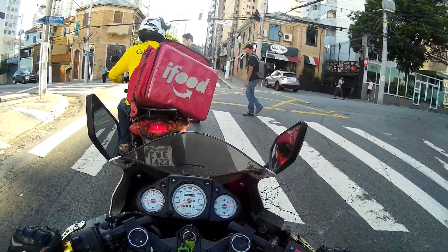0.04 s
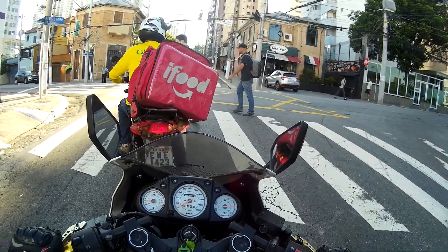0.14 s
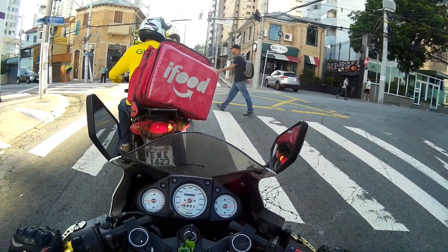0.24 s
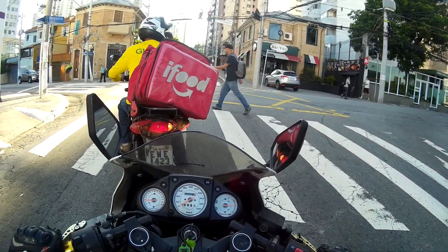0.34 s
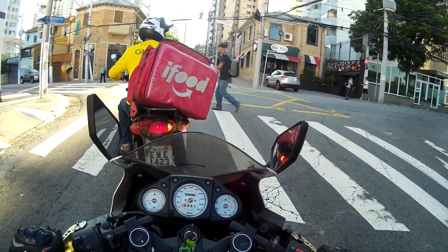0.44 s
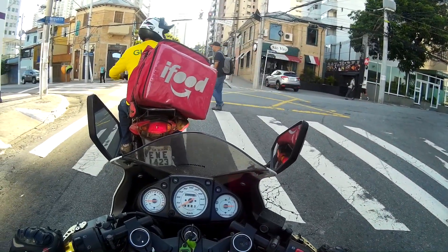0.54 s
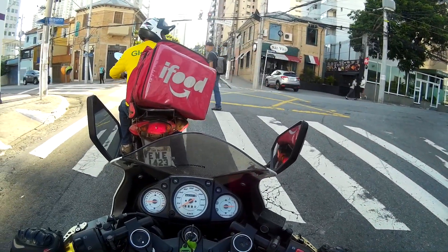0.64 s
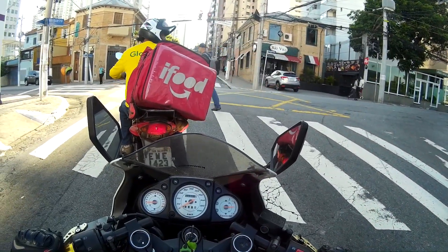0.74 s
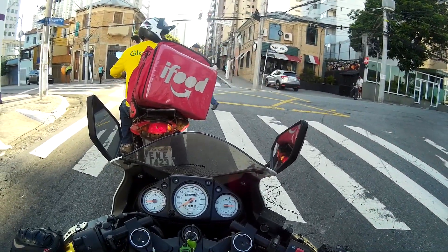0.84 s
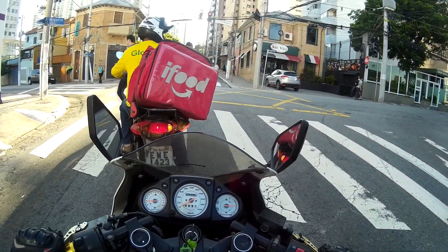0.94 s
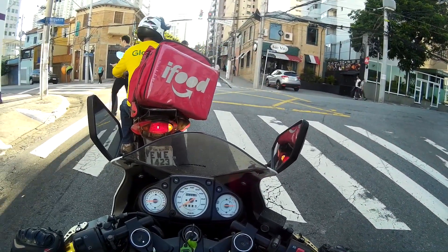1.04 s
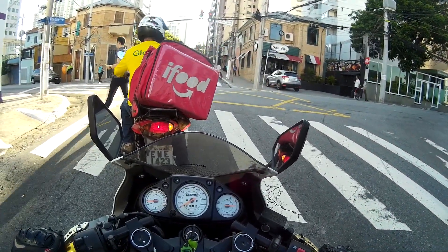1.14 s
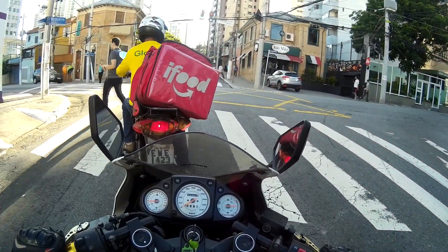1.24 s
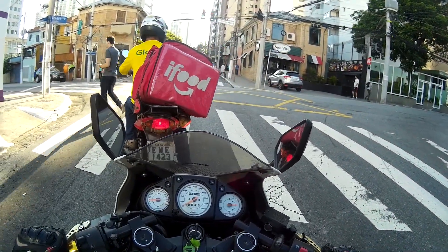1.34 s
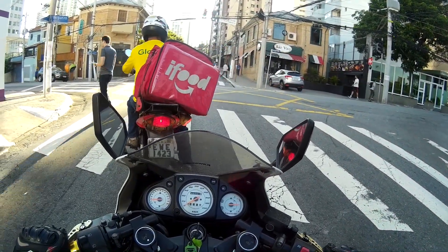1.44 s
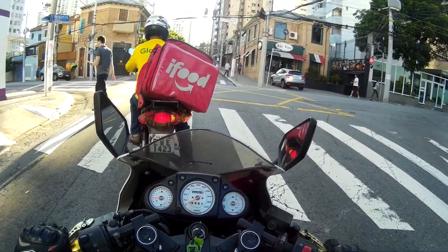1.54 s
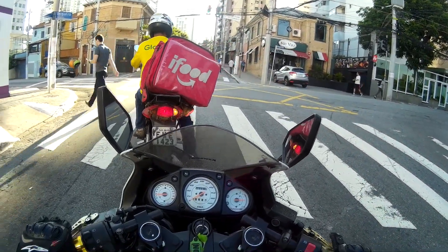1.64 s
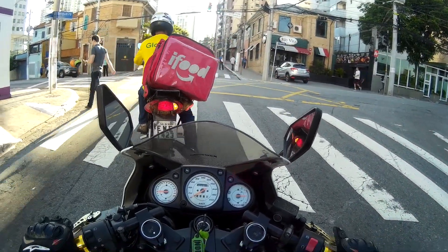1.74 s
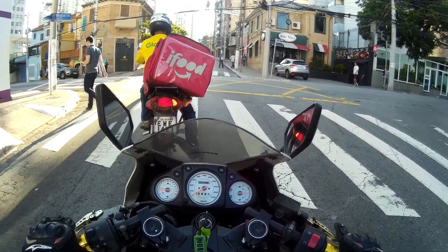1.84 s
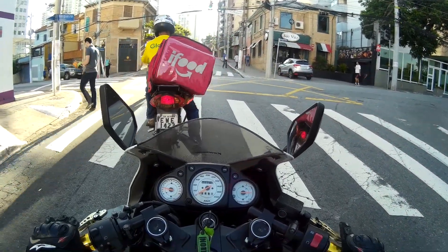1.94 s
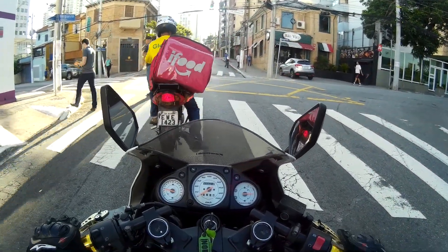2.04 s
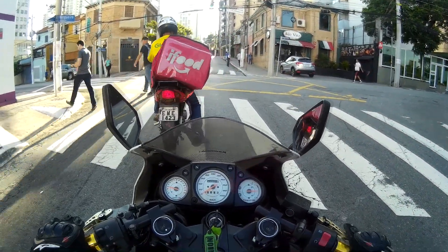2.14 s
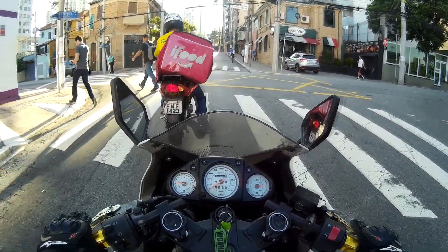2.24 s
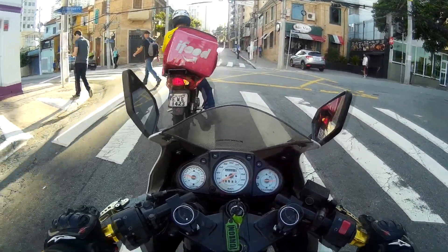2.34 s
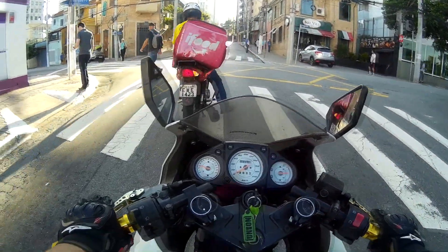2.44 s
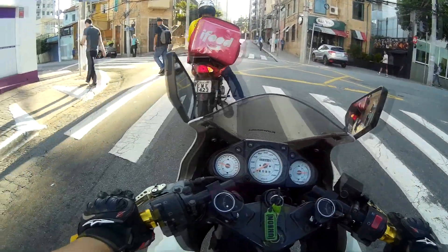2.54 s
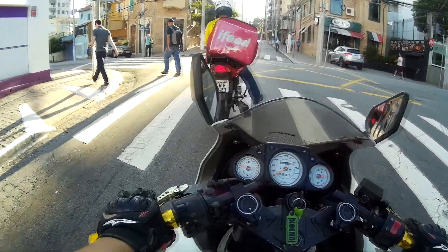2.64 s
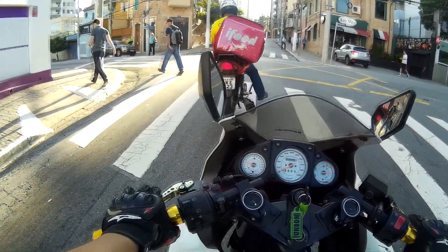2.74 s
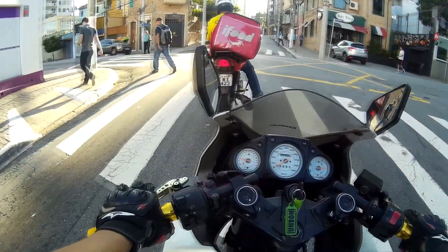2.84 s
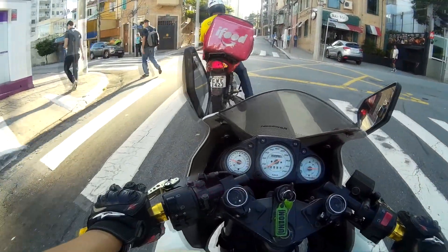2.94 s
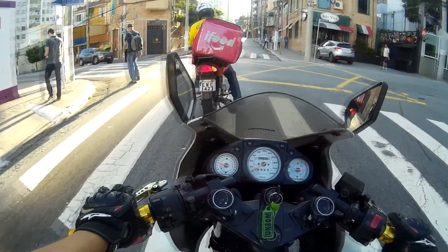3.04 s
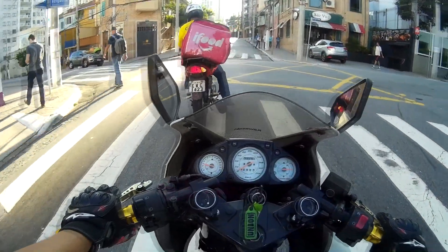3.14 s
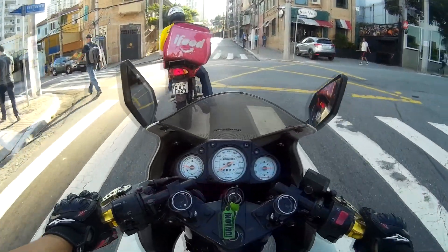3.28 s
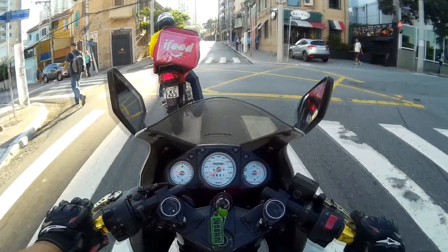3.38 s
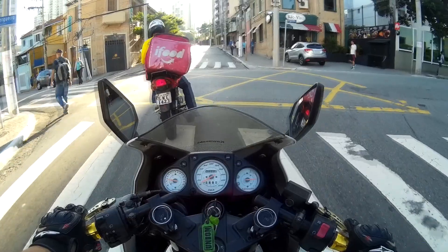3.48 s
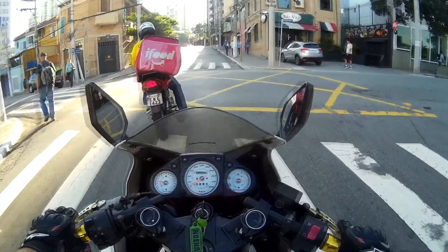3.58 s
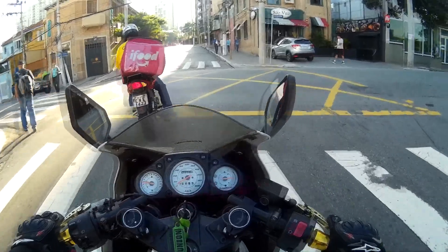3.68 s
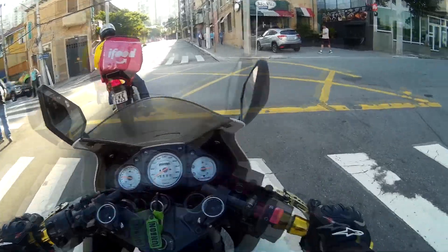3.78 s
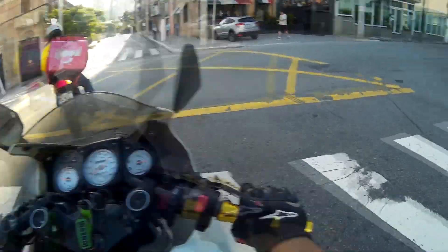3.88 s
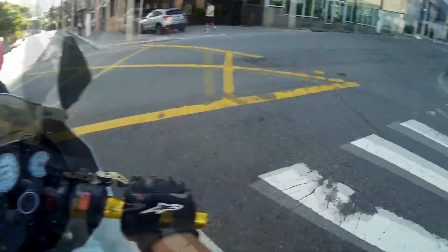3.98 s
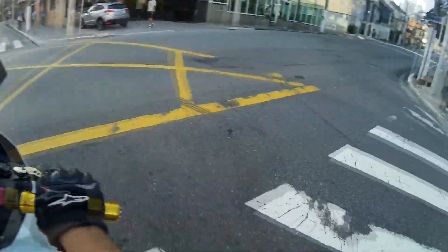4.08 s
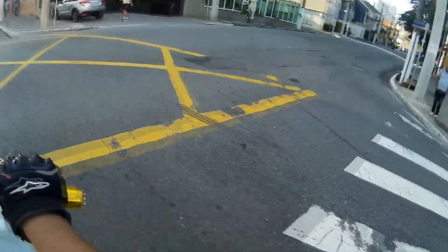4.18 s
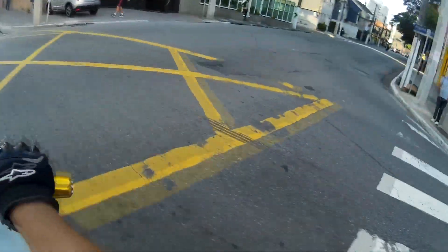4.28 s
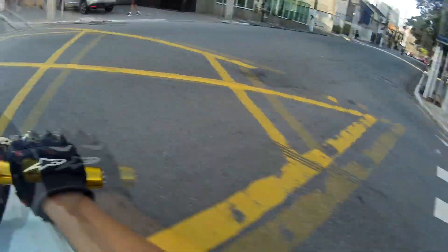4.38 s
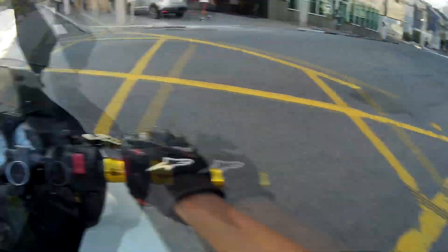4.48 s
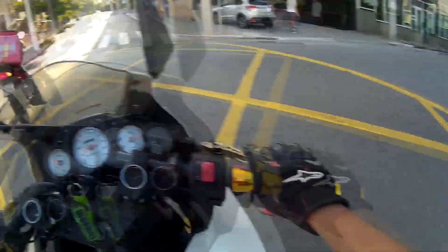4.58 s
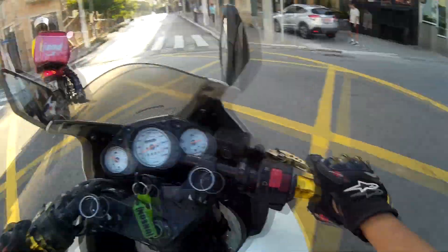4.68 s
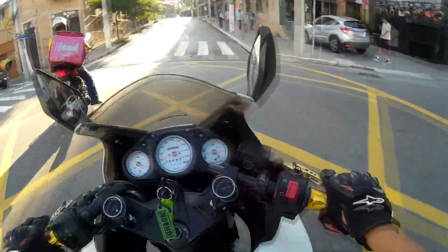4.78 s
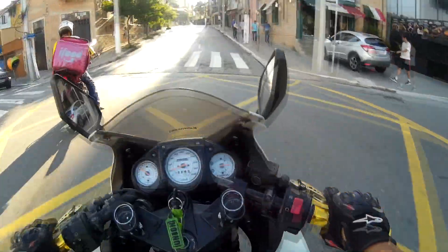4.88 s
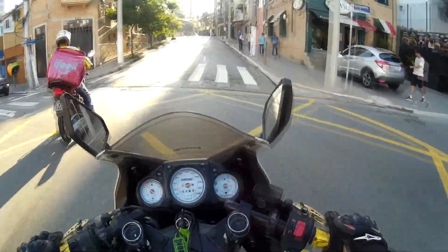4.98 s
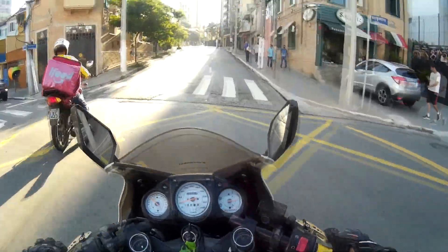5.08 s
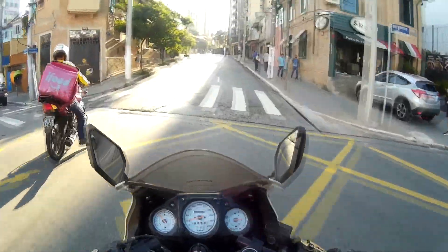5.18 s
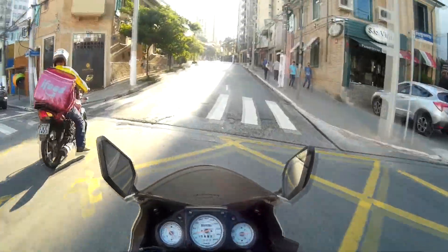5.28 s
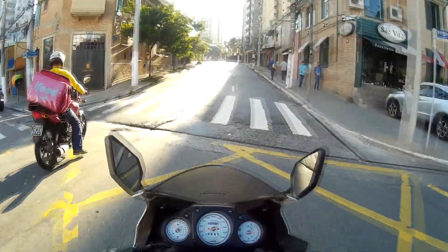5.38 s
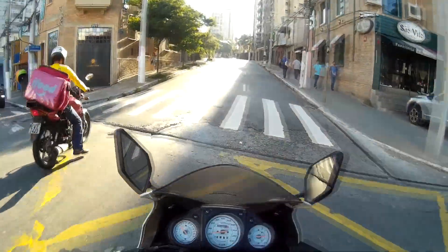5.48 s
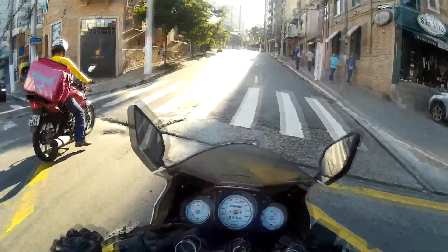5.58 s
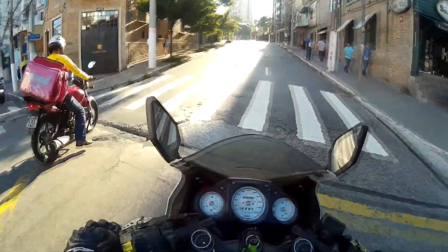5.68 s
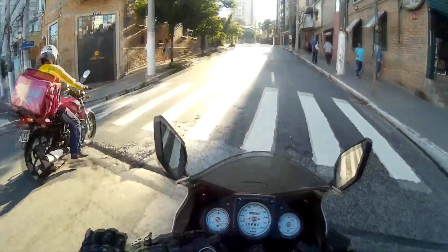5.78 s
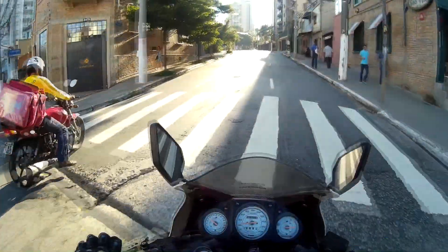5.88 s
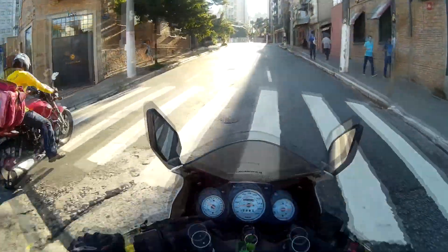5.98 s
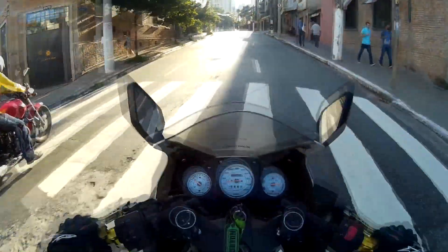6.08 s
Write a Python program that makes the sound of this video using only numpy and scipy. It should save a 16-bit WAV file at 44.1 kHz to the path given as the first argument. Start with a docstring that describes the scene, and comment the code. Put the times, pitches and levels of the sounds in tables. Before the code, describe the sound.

A small single-cylinder motorcycle idles softly just ahead, with separate hollow puffs and faint metal ticks over murmuring traffic. It suddenly revs up and pulls away in a steady throb, then accelerates to a raspy, ringing roar. The throttle shuts for a gear change, leaving a short low burble, and the engine pulls again. Outdoors, close microphone on a following rider, with light echo from house fronts and low wind buffeting.

```python
"""At a city crossing, a small single-cylinder motorcycle idles just ahead, pulls away, revs up, changes gear and pulls again.
Each firing drives two gas pulses through a resonant silencer; throttle sharpens them.
Pulsed noise makes the rasp, meshing teeth the gear whine, short resonant bursts the metal ticks.
House fronts echo, traffic murmurs, and low noise is the wind that buffets the microphone of the rider who follows."""
import sys
import numpy as np
from scipy import signal
from scipy.fft import rfft, irfft
from scipy.io import wavfile
from scipy.ndimage import uniform_filter1d

SR = 44100
rng = np.random.default_rng(int(sys.argv[2]) if len(sys.argv) > 2 else 0)


def transcribe(u):
    """Save the signal u as a 16-bit wav file named by the first command-line argument.

    u: samples, shape (n,) or (channels, n), limited to [-1, 1]; the rate is SR.
    q: integer samples, one column per channel.
    """
    v = np.clip(np.atleast_2d(u).T, -1, 1)
    q = np.round(v * 32767).astype(np.int16)
    wavfile.write(sys.argv[1], SR, q)


N = 269892
TIME = np.arange(N) / SR   # s

# engine speed; columns: time_s, firing_rate_hz
ENGINE_SPEED = [(0, 12.95), (.984, 13.59), (1.603, 13.5), (1.832, 24.12), (2.084, 24.96), (2.739, 20.8),
                (3.202, 20.47), (3.494, 22.18), (4.451, 34.54), (4.798, 39.61), (5.07, 42.64), (5.2, 38.81),
                (5.36, 36.27), (5.508, 37.27), (5.663, 30.87), (6.12, 35.22)]
# the rider's hand: a blip, easing off on the clutch, a long pull, a gear change, a second pull
# columns: time_s, throttle (0 to 1)
THROTTLE = [(1.57, 0), (1.63, 0.09), (1.88, 0.4), (2.42, 0.29), (2.85, 0.22), (3.5, 0.35), (3.95, .68),
            (4.1, 0.88), (4.3, 1), (4.5, 1), (5.02, 0.86), (5.16, 0.34), (5.37, 0.1), (5.42, 0.41),
            (5.68, 0.74), (6.12, 0.65)]
# single strokes that burn unevenly; columns: time_s, size_change_db, sharpness_factor
ODD_STROKES = [(1.785, -7, 1.43), (1.915, 1, 1.06), (1.953, -11.5, 1.2), (2.118, -8, 1.34), (4.33, -1, 2.2),
               (5.114, 2.5, 0.46), (5.139, -4.5, 3.1), (5.24, 2, 1.28)]
# levels as the bike draws ahead, then off to the side; columns: time_s, pipe_level_db, rasp_level_db
BIKE_PLACE = [(2.0, 1.7, 5), (3.0, 2.5, 3), (4.3, -2.84, 0), (4.85, -6, 0.5), (5.5, -7, -3.5),
              (6.12, -4.5, 3.5)]
# weaker chamber resonances and one dip; columns: centre_hz, width_hz, gain_db
CHAMBERS = [(167.6, 34, -3), (798.4, 36.7, 8.5), (1022, 46, 8), (1346, 207, 15)]
# spectrum of the gas rasp; columns: frequency_hz, relative_density_db (per Hz)
RASP_COLOUR = [(600, 11.5), (1000, 0), (1400, 0.5), (1850, -1.5), (2500, -11), (3100, -13.5), (3900, -21),
               (4700, -20), (5700, -31), (7000, -29.5), (9000, -37.5), (12000, -44.5), (15500, -63)]
# light metal ticks and clinks of the controls and drive; columns: start_s, peak_level_db, pitch_hz
TICKS = [(0.022, -45, 3980), (0.32, -47, 4150), (.385, -48.5, 3580), (0.443, -49, 3900), (.757, -50, 5000),
         (.788, -51, 4000), (0.842, -51, 4100), (1.12, -43, 3350), (1.791, -51, 7350), (1.83, -54, 7300),
         (1.857, -50, 7200), (1.923, -47, 7300), (5.556, -44.5, 3800), (5.591, -44, 3830)]
# echoes off road, fairing and house fronts; columns: delay_s, level_db
ECHOES = [(0.0107, -19.5), (0.0151, -23.5), (0.032, -26.5), (.058, -34), (0.098, -28.5)]
# spectrum of the wind; columns: frequency_hz, relative_density_db (per Hz)
WIND_COLOUR = [(20, 2), (38, 13), (65, 14.5), (130, -15.5), (400, -40)]
# spectrum of distant traffic and hiss; columns: frequency_hz, relative_density_db (per Hz)
STREET_COLOUR = [(60, -9.5), (105, 1.5), (160, -4.5), (240, 3), (370, -12.5), (500, -10), (750, -17.5),
                 (1000, -17), (1300, -33.5), (1850, -24.5), (2600, -39.5), (4500, -40.5), (8000, -43.5),
                 (15500, -49)]

START_PHASE, PISTON_LAG = .237, .241   # firing cycles
# throttle makes the puffs sharper and a little bigger
SOFT_PUFF_HZ, SHARPEN_OCTAVES, PUFF_DB, PUFF_OPEN_DB = 164, 3.616, -17.5, 5.5
# below a small opening the cylinder is starved of air: puffs and rasp fall away
STARVED_THROTTLE, STARVED_PUFF_DB, STARVED_RASP_DB = 0.2, -2.5, -20.5
# at high revs the silencer rings harder and the rasp grows
HIGH_REVS_FROM, HIGH_REVS_SPAN = 33.2, 5.9   # firings per s
HIGH_RING_DB, HIGH_RASP_DB = 3, 6.5

TAILPIPE_HZ, TAILPIPE_WIDTH_HZ, EXHAUST_DB = 712.4, 151.7, 43.0
# the boom is carried up by the revs from a lowest pitch
LOWEST_BOOM_HZ, BOOM_PER_FIRING, BOOM_WIDTH_HZ, BOOM_DB = 95, 4.1, 43, 7.5
# the second chamber resonance follows the boom part of the way
HOLLOW_HZ, HOLLOW_WIDTH_HZ, HOLLOW_DB, HOLLOW_FOLLOW = 228.5, 48, 5.5, 0.16
# the ring rises with hotter gas; with little gas flowing it is damped less
RING_HZ, RING_OPEN_HZ, RING_WIDTH_HZ, RING_DB, STILL_RING_DB = 468.4, 34.6, 48.2, 17.5, 1

RASP_DB = -40
# throttle shut for the gear change: start, attack, hold, release [s]
OVERRUN = (5.095, 0.031, 0.25, 0.023)
BURBLE_HZ, BURBLE_SAG_HZ_PER_S, BURBLE_DB = 158, 190, -32.5
# gear whine: teeth per firing, level entering the casing at full throttle, change when shut
WHINE_ORDER, WHINE_DB, WHINE_SHUT_DB = 46, -39.5, -13.5
CASING_HZ, CASING_WIDTH_HZ = 1827, 160

# wind swells as the following rider sets off: start, attack, hold, release [s]
GUST = (3.3, 1.0, 0.83, .2)
BREEZE_DB, GUST_DB = -55.5, -50
# at first the traffic is louder, then it dies down
STREET_DB, TRAFFIC_SWELL_DB, TRAFFIC_FADE_S = -42, 3, 0.62
# a faint hiss while the bikes wait: start, attack, hold, release [s]
HISS = (-0.079, .05, 1.3, 0.12)
HISS_DB, HISS_HZ, HISS_WIDTH_HZ = -67.5, 3504.5, 1900
CUTOFF_HZ = 15700


def gas_flow(piston_db, piston_sharpness, piston_spread_db, piston_jitter_s):
    """Blowdown and displacement: the opening exhaust valve frees one puff, the rising piston drives out a second."""
    times, cycle_s, size, sharp_hz = firings(sharp_spread_db=0.96, jitter_s=.00005)
    chance = rng.standard_normal((len(times), 2))
    second_times = times + PISTON_LAG * cycle_s + piston_jitter_s * chance[:, 0]
    second_size = size * from_db(piston_db + piston_spread_db * chance[:, 1])

    puff_times = np.r_[times, second_times]
    puff_sizes = np.r_[size, second_size]
    puff_hz = np.r_[sharp_hz, sharp_hz * piston_sharpness]
    flow = np.zeros(N)
    for start_s, amount, hz in zip(puff_times, puff_sizes, puff_hz):
        first = int(start_s * SR)
        span = slice(first, first + SR // 50)
        age = np.maximum(TIME[span] - start_s, 0)
        flow[span] += amount * puff(age, hz, opening=1.21, suction=0.98, suction_hz=150, hard_hz=940)
    return flow


def firings(sharp_spread_db, jitter_s):
    """Cyclic variation: firings follow speed and throttle, with chance in timing and sharpness."""
    cycles = engine_cycles()
    times = np.interp(np.arange(1, int(cycles[-1]) + 1), cycles, TIME)
    throttle = read(THROTTLE, times)[0]
    size_db = PUFF_DB + PUFF_OPEN_DB * throttle + STARVED_PUFF_DB * starved(throttle)
    size_db = size_db + read(BIKE_PLACE, times)[0]
    sharp_hz = SOFT_PUFF_HZ * 2 ** (SHARPEN_OCTAVES * throttle)
    for time_s, db, factor in ODD_STROKES:
        nearest = np.argmin(abs(times - time_s))
        size_db[nearest] += db
        sharp_hz[nearest] *= factor

    chance = rng.standard_normal((len(times), 2))
    sharp_hz = sharp_hz * from_db(sharp_spread_db * chance[:, 0])
    cycle_s = 1 / read(ENGINE_SPEED, times)[0]
    return times + jitter_s * chance[:, 1], cycle_s, from_db(size_db), sharp_hz


def puff(age, hz, opening, suction, suction_hz, hard_hz):
    """Pulse and rarefaction: the valve's opening rounds the gas pulse; a hard one leaves a slow suction behind it."""
    def pulse(corner_hz):
        """Critically damped pulse: a linear rise under exponential decay."""
        w = 2 * np.pi * corner_hz
        return w * w * age * np.exp(-w * age) / 1000

    r = np.exp(-2 * np.pi * opening * hz / SR)
    rounded = signal.lfilter([1 - r], [1, -r], pulse(hz))
    hardness = hz / (hz + hard_hz)
    return rounded - suction * hardness * pulse(suction_hz)


def exhaust(flow, turbulence, swirl_hz, volume_hz, mouth_hz):
    """Acoustic filtering: the silencer's volume smooths, chambers and tailpipe ring, the small mouth radiates little bass."""
    swirl = rms_one(cut(rng.standard_normal(N), swirl_hz, "low"))
    x = cut(flow * (1 + turbulence * swirl), volume_hz, "low")

    throttle = read(THROTTLE)[0]
    boom_hz = np.maximum(LOWEST_BOOM_HZ, BOOM_PER_FIRING * read(ENGINE_SPEED)[0])
    hollow_hz = HOLLOW_HZ * (boom_hz / boom_hz[0]) ** HOLLOW_FOLLOW
    ring_hz = RING_HZ + RING_OPEN_HZ * throttle
    ring_db = RING_DB + HIGH_RING_DB * high_revs() + STILL_RING_DB * starved(throttle)
    gliding = [(boom_hz, BOOM_WIDTH_HZ, BOOM_DB),
               (hollow_hz, HOLLOW_WIDTH_HZ, HOLLOW_DB),
               (ring_hz, RING_WIDTH_HZ, ring_db)]
    # in series: each adds a peak (or dip) to what went before
    for hz, width_hz, db in gliding:
        x = x + (from_db(db) - 1) * gliding_resonance(x, hz, width_hz)
    for hz, width_hz, db in CHAMBERS:
        x = x + (from_db(db) - 1) * resonate(x, hz, width_hz)
    tailpipe = resonate(x, TAILPIPE_HZ, TAILPIPE_WIDTH_HZ)
    return from_db(EXHAUST_DB) * cut(tailpipe, mouth_hz, "high")


def rasp(flow, decay_s, steady):
    """Flow-modulated noise: each puff tears a burst of hiss from the pipe, over the engine's steady clatter."""
    r = np.exp(-1 / (decay_s * SR))
    burst = signal.lfilter([1 - r], [1, -r], flow + 1e-18)
    # level the bursts over 0.15 s, so that only their rhythm remains
    burst = burst / np.sqrt(uniform_filter1d(burst ** 2, size=6615) + 1e-9)
    gate = np.sqrt((burst ** 2 + steady ** 2) / (1 + steady ** 2))
    db = RASP_DB + STARVED_RASP_DB * starved(read(THROTTLE)[0])
    db = db + HIGH_RASP_DB * high_revs() + read(BIKE_PLACE)[1]
    return from_db(db) * gate * noise(RASP_COLOUR)


def crackle(pressure, level_db, low_hz, high_hz):
    """Nonlinear radiation: noise grows with squared pressure, so the strongest peaks spit drily at the mouth."""
    spit = cut(rng.standard_normal(N) * pressure ** 2, low_hz, "high")
    return from_db(level_db) * cut(spit, high_hz, "low", order=3)


def burble(swell):
    """Pumping: with the throttle shut, each stroke sends a soft, low thump through the pipe, sinking in pitch."""
    hz = BURBLE_HZ - BURBLE_SAG_HZ_PER_S * np.clip(TIME - OVERRUN[0], 0, sum(OVERRUN[1:]))
    turn = engine_cycles() % 1
    age = turn / read(ENGINE_SPEED)[0]
    window = np.sin(np.pi * turn ** swell) ** 2
    thumps = rms_one(window * np.sin(2 * np.pi * hz * age))
    return -from_db(BURBLE_DB) * envelope(*OVERRUN) * thumps


def whine(width_hz, rough, throb):
    """Gear meshing: a rough tone throbs with the power strokes, loudest where it meets the casing's resonance."""
    stroke = 2 * np.pi * engine_cycles()
    in_phase, quadrature = rms_one(cut(rng.standard_normal((2, N)), width_hz, "low"))
    tone = (1 + rough * in_phase) * np.cos(WHINE_ORDER * stroke)
    tone = tone + rough * quadrature * np.sin(WHINE_ORDER * stroke)
    pressed = rms_one(tone * (1 + throb * np.sin(stroke)))
    db = WHINE_DB + WHINE_SHUT_DB * (1 - read(THROTTLE)[0])
    return from_db(db) * resonate(pressed, CASING_HZ, CASING_WIDTH_HZ)


def ticks(decay_s, width_hz):
    """Impact excitation: each touch of metal is a short burst in one resonance."""
    out = np.zeros(N)
    age = TIME[:SR // 20]
    for start_s, db, hz in TICKS:
        burst = rng.standard_normal(len(age)) * np.exp(-age / decay_s)
        tick = resonate(burst, hz, width_hz)
        first = max(int(start_s * SR), 0)
        out[first:first + len(age)] += from_db(db) * tick / abs(tick).max()
    return out


def street_echo(x, tail_db, t60_s, dull_hz):
    """Reflection and reverberation: a few dull echoes and a thin, diffuse tail between the houses."""
    age = TIME[:SR]
    response = rng.standard_normal(SR) * from_db(-60 * age / t60_s) * (age > .01)
    response *= from_db(tail_db) / np.linalg.norm(response)
    for delay_s, db in ECHOES:
        response[int(delay_s * SR)] += from_db(db)
    return cut(signal.fftconvolve(x, response)[:N], dull_hz, "low")


def wind():
    """Turbulent pressure: low noise at the microphone, a breeze that swells into a gust."""
    gain = from_db(BREEZE_DB) + from_db(GUST_DB) * envelope(*GUST)
    return gain * noise(WIND_COLOUR)


def traffic():
    """Superposition: many distant sources merge into coloured noise, louder at first."""
    db = STREET_DB + TRAFFIC_SWELL_DB * np.maximum(1 - TIME / TRAFFIC_FADE_S, 0)
    return from_db(db) * noise(STREET_COLOUR)


def waiting_hiss():
    """Band-limited noise: two equal resonances in series shape a faint hiss."""
    once = resonate(rng.standard_normal(N), HISS_HZ, HISS_WIDTH_HZ)
    twice = resonate(once, HISS_HZ, HISS_WIDTH_HZ)
    return from_db(HISS_DB) * envelope(*HISS) * rms_one(twice)


def engine_cycles():
    """Phase accumulation: firing cycles run so far, the integral of the firing rate."""
    return START_PHASE + np.cumsum(read(ENGINE_SPEED)[0]) / SR


def starved(throttle):
    """Air starvation: 1 with the throttle shut, soon near 0 as it opens."""
    return np.exp(-np.maximum(throttle, 0) / STARVED_THROTTLE)


def high_revs():
    """Speed dependence: 0 at low and middle revs, 1 near the top."""
    return np.clip((read(ENGINE_SPEED)[0] - HIGH_REVS_FROM) / HIGH_REVS_SPAN, 0, 1)


def gliding_resonance(x, hz, width_hz):
    """Time-varying resonance: gain 1 on top, its centre following a curve block by block."""
    out, state = np.zeros(N), np.zeros(2)
    for i in range(0, N, 256):
        block = slice(i, i + 256)
        b, a = signal.iirpeak(hz[i], hz[i] / width_hz, fs=SR)
        out[block], state = signal.lfilter(b, a, x[block] + 1e-18, zi=state)
    return out


def resonate(x, hz, width_hz):
    """Resonance: a band-pass with gain 1 on top."""
    b, a = signal.iirpeak(hz, hz / width_hz, fs=SR)
    return signal.lfilter(b, a, x + 1e-18)


def cut(x, hz, kind, order=2):
    """Band limiting: a Butterworth low- or high-pass."""
    sos = signal.butter(order, min(hz, .45 * SR), kind, fs=SR, output="sos")
    return signal.sosfilt(sos, x + 1e-18)


def noise(colour):
    """Spectral shaping: noise of the given spectrum at rms 1; below the first point it falls away."""
    hz, db = np.transpose(colour)
    f = np.maximum(np.fft.rfftfreq(N, 1 / SR), 1)
    gain = from_db(np.interp(np.log(f), np.log(hz), db)) * np.minimum(f / hz[0], 1) ** 2
    return rms_one(irfft(rfft(rng.standard_normal(N)) * gain, N))


def envelope(start, attack, hold, release):
    """Amplitude envelope: rise, hold and fall between 0 and 1."""
    return np.interp(TIME, start + np.cumsum([0, attack, hold, release]), [0, 1, 1, 0])


def read(rows, at=TIME):
    """Linear interpolation: columns of a curve at the given times."""
    time_s, *columns = np.transpose(rows)
    return [np.interp(at, time_s, column) for column in columns]


def from_db(db):
    """Logarithmic level: decibels to amplitude gain."""
    return 10 ** (np.asarray(db) / 20)


def rms_one(x):
    """Normalisation: scale to unit rms."""
    return x / np.sqrt(np.mean(x ** 2) + 1e-20)


def scene():
    """Superposition: the motorcycle and its echo, the wind, the street."""
    flow = gas_flow(piston_db=-1.45, piston_sharpness=1.07, piston_spread_db=2.0, piston_jitter_s=.00006)
    pipe = exhaust(flow, turbulence=0.053, swirl_hz=3000, volume_hz=86.0, mouth_hz=150.5)
    gas = rasp(flow, decay_s=0.012, steady=0.67)
    gas = gas + crackle(pipe, level_db=-29.5, low_hz=1200, high_hz=5260)
    gears = whine(width_hz=65, rough=0.52, throb=0.52)
    metal = ticks(decay_s=0.0033, width_hz=360)
    bike = pipe + gas + burble(swell=0.82) + gears + metal
    echo = street_echo(bike, tail_db=-20, t60_s=1.0, dull_hz=5000)
    return (bike + echo + wind() + traffic() + waiting_hiss())[None]


def record(dry):
    """Saturation and band limiting: the microphone rounds the strongest puffs; the top of the band is cut."""
    rounded = .97 * np.tanh(dry / .97)
    sos = signal.ellip(10, .1, 80, CUTOFF_HZ, fs=SR, output="sos")
    return signal.sosfilt(sos, rounded)


dry = scene()
out = record(dry)
transcribe(out)
```